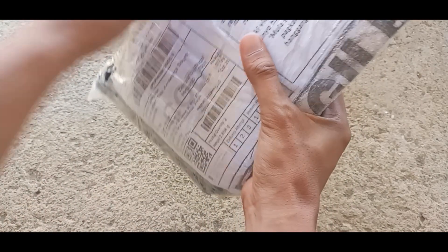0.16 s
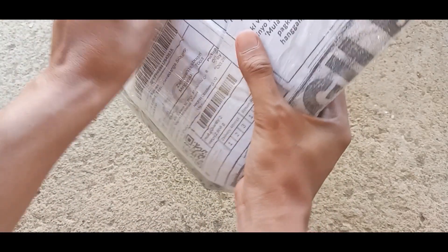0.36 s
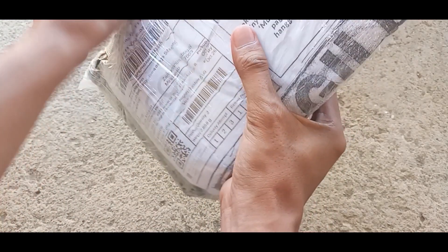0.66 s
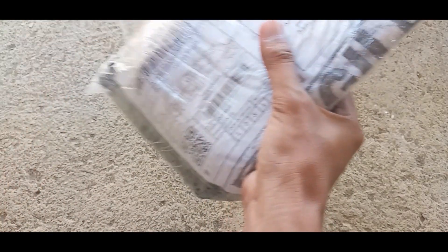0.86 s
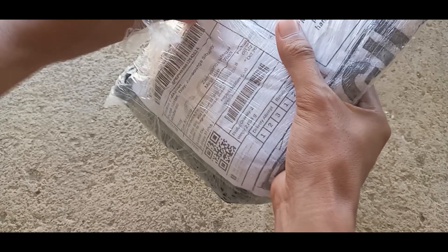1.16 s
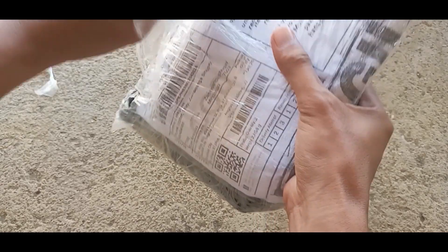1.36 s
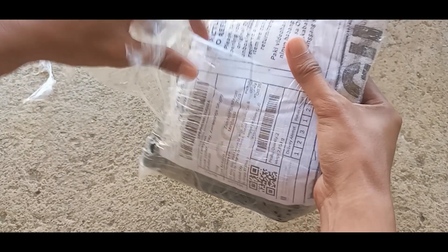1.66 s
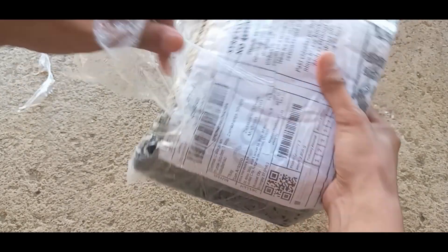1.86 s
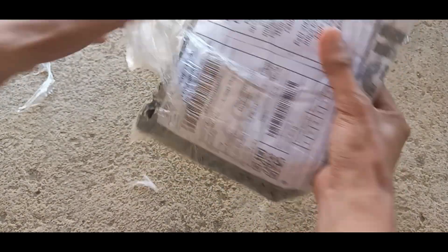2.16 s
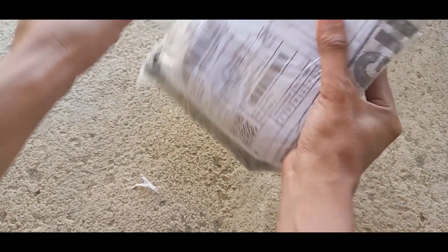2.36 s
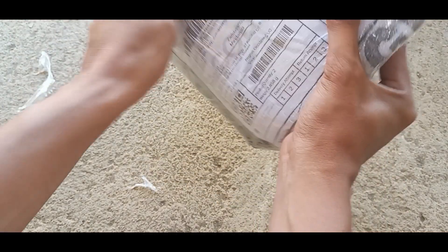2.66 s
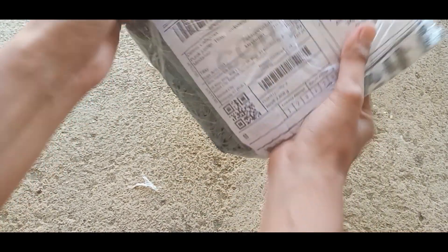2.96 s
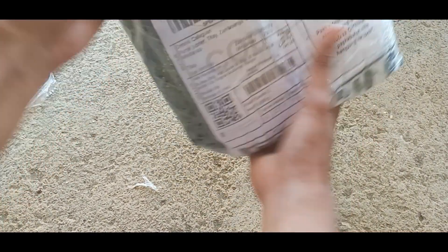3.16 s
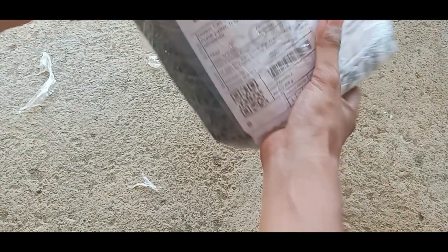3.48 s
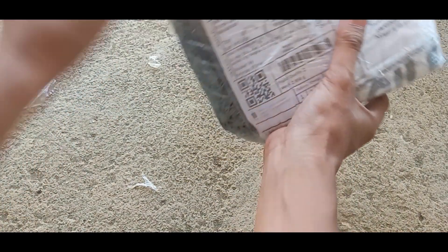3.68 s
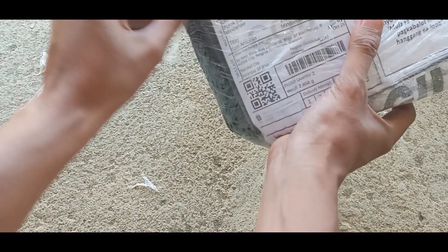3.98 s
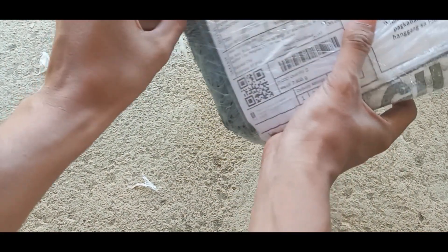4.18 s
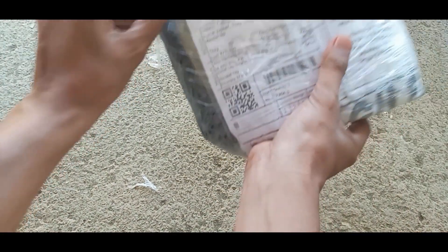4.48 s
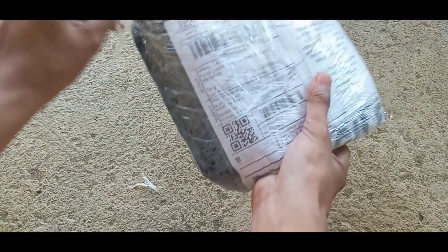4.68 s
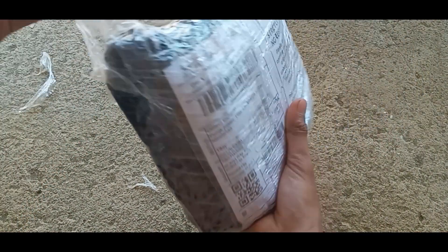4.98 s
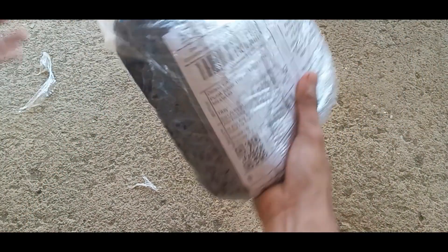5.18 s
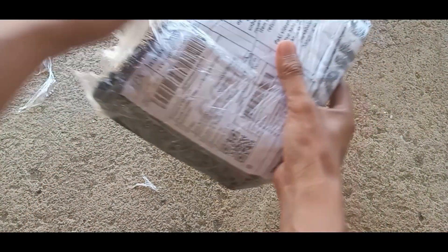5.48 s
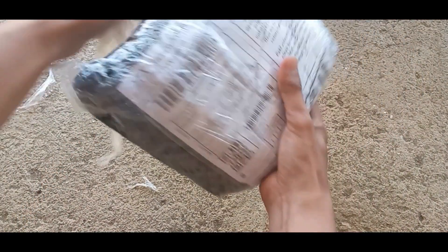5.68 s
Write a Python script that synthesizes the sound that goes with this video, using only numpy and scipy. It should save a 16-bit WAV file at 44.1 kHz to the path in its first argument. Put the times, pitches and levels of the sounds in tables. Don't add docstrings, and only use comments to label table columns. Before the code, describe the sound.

Close, crisp plastic wrap crackles in uneven bursts with hard pops, short lulls, soft bag booms and low puffs of air.

```python
import sys
import numpy as np
from scipy import signal
from scipy.io import wavfile

SR = 44100
rng = np.random.default_rng(int(sys.argv[2]) if len(sys.argv) > 2 else 0)


def elevation(decibels):
    levels = np.asarray(decibels, float)
    return 10 ** (levels / 20)


def generate_wav(signal):
    frames = np.transpose(np.atleast_2d(signal))
    scaled = np.clip(frames, -1, 1) * 32767
    pcm = np.round(scaled).astype(np.int16)
    wavfile.write(sys.argv[1], SR, pcm)


N = 257103
FILM_HZ = 5740

# time in seconds, boom level in dB, air puff level in dB, fade time in seconds.
HAND_BUMPS = [(0.195, -36.5, -48, 0.013), (.45, -55, -46, 0.058), (.694, -49, -54.5, 0.065),
              (1.19, -76, -40, 0.097), (1.44, -53, -42.5, 0.061), (1.615, -37, -37, 0.033),
              (1.72, -48, -62, 0.047), (1.83, -42.5, -48.5, 0.12), (2.031, -39, -54, 0.012),
              (2.201, -49, -46, 0.029), (2.67, -54, -43, 0.024), (2.918, -44.5, -45, 0.017),
              (3.1, -73, -49, 0.011), (3.213, -33, -39.5, 0.0087), (3.33, -43, -49, 0.062),
              (3.408, -41, -46, 0.016), (3.54, -65, -45, 0.035), (3.828, -77, -43, 0.011),
              (4.657, -27, -36, 0.0076), (4.676, -32.5, -40, 0.019), (4.82, -48, -63, 0.015),
              (4.981, -48, -47, 0.045), (5.295, -73, -31, 0.034), (5.36, -67, -50, 0.027),
              (5.45, -56, -35, 0.026), (5.57, -44, -52, 0.089), (5.73, -44, -59, 0.086)]


def rms_one(x):
    return x / np.sqrt(np.mean(x ** 2) + 1e-20)


def band(x, hz, kind, order=2):
    return signal.sosfilt(signal.butter(order, hz, kind, fs=SR, output="sos"), x)


def peak(x, hz, width_hz, db):
    w, g = 2 * np.pi * hz / SR, elevation(db / 2)
    a = np.tan(np.pi * width_hz / SR)
    above = [1 + a * g, -2 * np.cos(w), 1 - a * g]
    below = [1 + a / g, -2 * np.cos(w), 1 - a / g]
    return signal.lfilter(above, below, x)


def drift(rate_hz):
    r = np.exp(-2 * np.pi * rate_hz / SR)
    noise = rng.standard_normal(N + SR)
    return rms_one(signal.lfilter([1], [1, -2 * r, r * r], noise)[SR:])


def sides(pan_db):
    return elevation(np.array([pan_db / 2, -pan_db / 2]))


def swell(s, db, fade_s, rest_db, steep=0.89):
    rise_share = 0.78
    t = np.arange(0, N, 64) / SR
    late = (t - s[:, None]) / np.maximum(fade_s, .005)[:, None]
    fall_db = 10 * steep * np.maximum(late, -late / rise_share)
    power = elevation(db[:, None] - fall_db) ** 2
    level_db = 10 * np.log10(power.sum(axis=0) + elevation(rest_db) ** 2)
    return np.interp(np.arange(N) / SR, t, level_db)


def pause_db(column):
    # middle in seconds, length in seconds, drop of the folds in dB, drop of the film in dB.
    pauses = [(.98, 0.14, 2, -2), (2.29, 0.051, 11, 4), (2.414, 0.069, 14, 3), (3.588, 0.049, 12, -1.5),
              (3.685, 0.049, 11, -1.5), (3.81, 0.033, 8, -3.5), (3.982, 0.086, 7, -0.5),
              (4.092, 0.032, 10, 0.5), (3.195, 0.011, 11, 9), (4.323, 0.026, 7, 7), (4.539, 0.032, 7.5, 3),
              (1.515, 0.017, 6, 5), (2.053, 0.021, 11, 7), (1.678, 0.013, 3, 10), (4.618, 0.027, 11, 0.5),
              (5.186, 0.11, 1.5, -1), (5.405, 0.096, 12, 4)]
    t = np.arange(0, N, 64) / SR
    drop_db = sum(row[column] * np.exp(-(2 * (t - row[0]) / row[1]) ** 4) for row in pauses)
    return np.interp(np.arange(N) / SR, t, drop_db)


def pull():
    # peak time in seconds,
    # film level in dB, fade time in seconds, wide folds re film in dB, bag re film in dB.
    tugs = [(0.0, -34.5, 0.058, -4.5, -26), (0.124, -31, 0.049, -8.5, -35), (0.29, -27.5, 0.18, -5, -13),
            (0.439, -30.5, 0.065, -3.5, -8), (0.536, -30, 0.052, -4.5, -10.5),
            (0.684, -25, 0.077, -4.5, -15), (0.821, -25.5, 0.053, -7, -13.5),
            (1.064, -59, 0.73, -6, -27), (1.153, -31.5, 0.13, -11, -19.5), (1.248, -27, 0.011, -7, -12),
            (1.364, -24, 0.19, -5, -14.5), (1.481, -24, 0.012, -5, -37), (1.552, -29, 0.02, -13, -8.5),
            (1.622, -28.5, 0.034, -5, -12), (1.715, -29, 0.2, -5, -11), (1.851, -22, 0.048, -4, -15.5),
            (1.974, -30.5, 0.2, -3, -13.5), (2.152, -30.5, 0.081, -7.5, -13.5),
            (2.346, -37.5, 0.037, -6, -36), (2.455, -34.5, 0.032, -1, -4),
            (2.53, -23.5, 0.039, -9, -11.5), (2.613, -26, 0.12, -6.5, -10.5),
            (2.72, -25.5, 0.048, -4, -22), (2.804, -30.5, 0.12, -0.5, -22),
            (2.915, -27.5, 0.046, -5.5, -8), (2.977, -26, 0.067, -5.5, -13),
               (3.113, -24.5, 0.069, -9, -14.5), (3.298, -33, 0.18, -0.5, -5),
               (3.401, -24, 0.023, -13, -18), (3.499, -30, 0.058, -6.5, -22),
               (3.631, -37, 0.073, -0.5, -15), (3.753, -38.5, 0.1, -5.5, -12),
               (3.881, -32, 0.06, -6.5, -15.5), (4.036, -44, 0.022, 5.5, -1),
               (4.101, -26.5, 0.0087, 2.5, -35), (4.207, -25, 0.085, -6, -14.5),
               (4.269, -27, 0.038, -7, -21), (4.363, -34, 0.041, -3.5, -15),
               (4.465, -29.5, 0.085, -23, -40), (4.485, -38, 0.12, 7.5, -9), (4.662, -23, 0.065, -3.5, -11),
               (4.796, -29.5, 0.11, -6.5, -11.5), (4.956, -28.5, 0.063, -3.5, -15),
               (5.115, -47, 0.096, -3, -17), (5.298, -49.5, 0.16, 3.5, -9), (5.491, -31, 0.026, 1.5, -3),
               (5.606, -28.5, 0.16, -4, -11), (5.733, -25.5, 0.072, -5, -13.5)]
    s, db, fade_s, fold_db, bag_db = np.array(tugs).T
    low_db = pause_db(column=2)
    film = swell(s, db, fade_s, rest_db=-43) - pause_db(column=3)
    folds = swell(s, db + fold_db, fade_s, rest_db=-72, steep=0.93) - low_db
    ring = swell(s, db + bag_db, fade_s, rest_db=-88, steep=1.19) - low_db
    boom = swell(s, db + bag_db - 7.5, fade_s, rest_db=-63.5, steep=1.33) - 0.26 * low_db
    return film, folds, ring, boom


def cracks(decay_s, alike, size):
    t = np.arange(size) / SR
    common, left, right = np.moveaxis(rng.standard_normal((len(decay_s), 3, size)), 1, 0)
    alike = np.clip(alike, 0, 1)
    pair = np.sqrt(alike) * common + np.sqrt(1 - alike) * np.array([left, right])
    onset = 1 - np.exp(-t / .0001)
    return pair * np.exp(-t / decay_s[:, None]) * onset


def scatter(bursts, times):
    lag_s, lag_spread_s = .00095, .00004
    lag = lag_s + lag_spread_s * rng.standard_normal(len(times))
    out = []
    for wave, start in zip(bursts, (times + lag, times)):
        at = np.round(start * SR).astype(int)[:, None] + np.arange(wave.shape[1])
        out.append(np.bincount(at.ravel(), wave.ravel(), N + SR)[:N])
    return np.array(out)


def buckles(count=17000):
    when, size, length, colour = rng.random((count, 4)).T
    times = when * N / SR
    size_db = 2.06 * np.minimum(-np.log(1 - size), 3.8)
    size_db = size_db + 1.28 * drift(32.0)[(times * SR).astype(int)]
    bursts = cracks(.00016 * elevation(14 * length), alike=0.73, size=120)
    bursts = bursts + (2 * colour[:, None] - 1) * np.roll(bursts, 4, axis=2)
    return scatter(bursts * elevation(size_db)[:, None], times)


def bag_boom(grains, boom_db):
    boom = rms_one(band(grains, [220, 760], "band", order=3)) * elevation(boom_db + 2.0)
    s, bump_db, _, fade_s = np.transpose(HAND_BUMPS)
    thud_db = swell(s, bump_db, 0.55 * fade_s, rest_db=-120)
    return boom + rms_one(band(grains, [210, 480], "band")) * elevation(thud_db + 2.5)


def bag_ring(grains, ring_db):
    # peak time in seconds, level in dB, fade time in seconds.
    drumming = [(.27, -52, 0.023), (.33, -47, 0.036), (.69, -47, 0.046), (1.02, -72, .03),
                (1.36, -72, 0.043), (2.03, -40, 0.011), (2.53, -61, 0.023), (2.59, -44, 0.02),
                (2.66, -48, .015), (2.70, -40, .015), (2.73, -37, .02), (2.8, -45, 0.04),
                (4.49, -50, 0.033), (5.49, -64, 0.025)]
    panel_hz, panel_width_hz = 1090, 550
    ring = rms_one(band(grains, [950, 1400], "band")) * elevation(ring_db - 4.5)
    s, db, fade_s = np.transpose(drumming)
    panel = band(grains, [panel_hz - panel_width_hz / 2, panel_hz + panel_width_hz / 2], "band")
    return ring + rms_one(panel) * elevation(swell(s, db, fade_s, rest_db=-120))


def crinkle():
    film_db, sheet_db, ring_db, boom_db = pull()
    grains = buckles()
    boom = bag_boom(grains, boom_db)
    bag = bag_ring(grains, ring_db)
    lean_db = ring_db - sheet_db
    lean_db = np.clip(lean_db - np.mean(lean_db), -18, 2)
    edges_hz = 1500 * 2 ** np.arange(0, 3.6, .35)
    patches = []
    for k in range(10):
        patch_db = 1.9 * drift(7.5) + 0.68 * lean_db / (1 + k)
        if k > 7:
            patch_db = patch_db + 0.19 * (film_db - film_db.mean())
        if k < 5:
            patch_db = patch_db + 0.17 * k * pause_db(column=2)
        patches.append((-1) ** k * band(grains, edges_hz[k:k + 2], "band") * elevation(patch_db))
    sheet = rms_one(sum(patches[:5])) * elevation(sheet_db - 1.5)
    film = rms_one(band(sum(patches[5:]), 3000, "high", order=4)) * elevation(film_db - 5.0)
    return (boom - bag + sheet + film) * sides(0.93 * drift(1.9))


def snaps(rows, decay_s):
    times, level_db, fold_hz, bright_db = rows.T
    decay_s = decay_s * elevation(.15 * (level_db - level_db.mean()))
    bursts = cracks(decay_s, alike=0.58, size=500)
    bright = band(bursts * np.exp(-np.arange(500) / SR / .0012), 4000, "high")
    folds = [band(bursts[:, k], [hz / 1.193, hz * 1.33], "band") for k, hz in enumerate(fold_hz)]
    folds = np.swapaxes(np.array(folds), 0, 1)
    sheet_gain = elevation(-9.0 + 0.35 * np.clip(level_db + 13.5, 0, 20))
    folds = folds + sheet_gain[:, None] * band(bursts, [850, 5200], "band")
    bright = bright / bright[:, :, :80].std(axis=(0, 2), keepdims=True)
    folds = folds / folds[:, :, :80].std(axis=(0, 2), keepdims=True)
    fold_gain = elevation(level_db - 14.5) / np.sqrt(1 + elevation(bright_db) ** 2)
    mixed = folds + bright * elevation(bright_db - 6.0)[:, None]
    return scatter(mixed * fold_gain[:, None], times - .0012)


def stray_snaps(count=70):
    when, size, pitch, colour = rng.random((count, 4)).T
    fold_db = pull()[1][(when * N).astype(int)]
    level_db = fold_db - 5 + 0.5 * np.log(1 - size)
    fold_hz = FILM_HZ * (0.25 + 0.44 * np.sqrt(pitch))
    bright_db = 11 + 16 * (colour - .5)
    return np.transpose([0.0012 + when * N / SR, level_db, fold_hz, bright_db])


def loud_snaps():
    # time in seconds, level in dB, fold pitch in Hz, brightness in dB.
    fold_rows = [(.6627, -11, 2200, 2), (.741, -2.5, 1980, 9.5), (1.4226, -11, 2080, -16),
                 (1.543, 0, 2500, 11.5), (1.661, 4, 2800, 15), (1.6908, 5.5, 2260, 6.5),
                 (1.8289, 2, 2280, 11), (1.9276, -2.5, 2260, 6), (2.0234, -1, 3360, 10),
                 (2.3324, -21.5, 3520, -3), (2.444, -20, 2600, 0), (2.6939, -9, 1100, -25),
                 (3.0875, -12.5, 2570, -20), (3.1732, 1.5, 2200, 20), (3.2038, 9.5, 2830, 8.5),
                 (3.5077, -12, 2640, -7), (3.6172, -15, 2190, 8), (3.759, -12, 1930, -7),
                 (3.8614, -8, 2040, -8), (3.899, -14.5, 1270, -4), (4.0188, -20.5, 2570, -9),
                 (4.107, -12, 3230, -22), (4.41, 0, 2500, 6), (4.4658, -4, 1320, 11),
                 (4.5783, -7, 3050, -1.5), (4.651, 6, 3020, 12), (4.7302, -10, 2300, -9),
                 (4.9838, -8.5, 2800, 1), (5.3372, -4, 2480, 12), (5.474, -20, 3340, -10)]
    # time in seconds, level in dB, brightness in dB.
    film_rows = [(0.0857, -17, 16), (0.8015, -9, 8), (1.071, -14, 23), (1.2973, -2.5, 11),
                 (1.4862, -0.5, 23), (1.526, -12, 28), (1.619, -4, 17), (1.853, 6.5, 34), (1.8878, 3, 10),
                 (1.99, -12, 6), (2.5566, -7, 4.5), (2.838, -4.5, 28), (2.8602, 3, 18), (3.144, 3, 33),
                 (3.3524, -2, 17), (3.396, -3, 18), (4.0586, -7, 20), (4.0979, -7, 11), (4.166, -6, 11),
                 (4.346, -11, 5), (4.4426, 1.5, 14), (4.458, 3.5, 22), (4.5, 2, 29), (4.64, 6, 25),
                 (4.6638, -2, 13), (4.672, -7, 0), (4.6794, 4, 19), (4.686, -6, 0), (4.9015, -9, 2),
                 (5.187, -12, 38)]
    taut = [(s, db, FILM_HZ, bright_db) for s, db, bright_db in film_rows]
    return snaps(np.vstack([fold_rows, taut, stray_snaps()]), decay_s=0.0015)


def ticks():
    # time in
    # seconds, peak level in dB, fold pitch in Hz, brightness in dB.
    tick_rows = [(0.0223, -25, 4160, 8), (0.0634, -20, 3970, 13), (0.1126, -23, 2250, 17),
                 (0.185, -13, 3250, 8), (0.217, -19, 2950, 8), (0.2526, -19, 4390, 8),
                 (0.3393, -9, 4260, 10), (0.4375, -16, 2760, 2), (0.519, -13.5, 3200, 8),
                 (0.5659, -11, 2680, 4), (0.639, -21, 4220, 11), (0.6876, -21, 1220, 14),
                 (0.8567, -14.5, 1090, 7), (0.921, -21, 3720, 1), (0.9525, -26, 3500, 10),
                 (1.0011, -27, 4440, 10), (1.0591, -11.5, 4105, 15), (1.0988, -18.5, 4470, 17),
                 (1.1194, -19, 4050, 12), (1.2294, -29, 4320, 11), (1.275, -17, 4350, 3),
                 (1.4431, -26, 3980, 4), (1.4782, -10.5, 2130, 6), (1.8117, -13, 2900, 10),
                 (1.8996, -10, 2980, 3), (2.035, -15, 2170, 4), (2.0657, -14, 4350, 11),
                 (2.1026, -16, 2160, 8), (2.1211, -12, 3030, 20), (2.135, -23, 4250, 7),
                 (2.365, -29, 4400, 15), (2.185, -20, 1370, 1), (2.453, -15.5, 2710, 2),
                 (2.502, -18, 2880, 11), (2.5173, -10.5, 1000, 9.5), (2.6, -13, 1030, 5),
                 (2.614, -14, 4340, -4), (2.6797, -19, 1180, 10), (2.7154, -10.5, 1100, 3),
                 (2.747, -16, 3470, -1), (2.798, -13, 4200, 8), (2.8805, -10, 3230, 17),
                 (2.9192, -12.5, 4420, 2), (2.959, -13, 1960, 4), (2.9943, -11, 4080, 8),
                 (3.0479, -12, 2000, 7), (3.099, -9, 4420, 8), (3.1265, -15, 4080, 12),
                 (3.2923, -19, 2210, 0), (3.324, -18, 4200, 20), (3.4425, -25, 4370, 8),
                 (3.4787, -15, 4140, 20), (3.4994, -19, 3100, 5), (3.537, -18.5, 3760, 14),
                 (3.6264, -23, 2500, 7), (3.695, -24, 4240, 6), (3.7993, -33, 4430, 13),
                 (3.821, -19, 2150, 12), (3.9292, -18, 4470, 18), (3.9564, -33, 4140, 0),
                 (3.97, -15.5, 4050, 34), (4.14, -22, 4280, 5), (4.177, -15, 4300, 10),
                 (4.2413, -14, 3200, 7), (4.478, -1, 4430, 13), (4.5622, -17.5, 1310, 1.5),
                 (4.6128, -10, 1330, 11), (4.75, -24, 3170, 4), (4.78, -13, 1340, 16),
                 (4.8144, -13, 3460, 5), (4.961, -16, 2900, 19), (5.009, -16, 2720, 12),
                 (5.077, -15.5, 3780, 16), (5.0993, -28, 3890, 12), (5.2036, -28, 2110, 7),
                 (5.2767, -29, 4170, 0), (5.2947, -25.5, 2110, -4), (5.3971, -39, 3600, 8),
                 (5.5494, -20, 3270, 1), (5.6, -14, 2290, 2), (5.6403, -12, 4400, 5), (5.689, -12, 2950, 8),
                 (5.7644, -15, 3240, 2),
                 (0.2905, -14, 1060, 2), (0.4094, -15, 2570, 4), (0.47, -28, 4310, 8),
                 (0.5817, -34, 2210, 13), (0.6977, -13.5, 1080, 3.5), (0.873, -14, 3760, 8),
                 (1.7072, -13, 2910, 3), (1.7256, -14, 1980, -3), (1.996, -16, 3080, 4),
                 (2.2, -18, 1250, 5), (2.2324, -18, 3970, 8), (2.5324, -19, 1150, 6),
                 (2.7344, -12, 3230, 6), (3.1346, -17, 3360, 12), (3.1512, -16, 4330, 12),
                 (3.4094, -15, 4340, 12), (3.8794, -34, 1750, 15), (4.027, -28, 2000, 0),
                 (4.214, -26, 4020, 16), (4.044, -35, 1220, 4), (4.373, -21, 1180, 4),
                 (4.389, -16, 2000, 6), (4.458, -15, 1210, 3), (4.492, -11, 1240, 4), (4.507, -12, 1300, 5),
                 (5.0244, -31, 3760, 8), (5.124, -28, 4380, 4), (5.1344, -27, 1950, 7),
                 (5.1505, -29, 1930, 8), (5.482, -15, 3430, 16), (5.62, -11, 3990, 11),
                 (5.772, -9, 3200, 6), (5.7828, -7, 3060, 7), (5.7934, -11.5, 3190, 8)]
    rows = np.array(tick_rows)
    return snaps(rows + [.001, 5, 0, 0], decay_s=0.00055)


def singing():
    # start in seconds, level in dB, pitch in Hz, decay in seconds.
    strips = [
        (.954, -60, 2200, .04),
        (2.079, -45, 2150, .012),
        (3.985, -60, 1000, .025),
        (3.68, -57, 3400, .02),
    ]
    start_s, level_db, pitch_hz, decay_s = np.transpose(strips)
    bursts = cracks(decay_s, alike=1.0, size=5000)
    rings = [band(bursts[:, k], [hz / 1.03, hz * 1.03], "band") for k, hz in enumerate(pitch_hz)]
    rings = np.array(rings)
    rings = rings / rings[:, :, :900].std(axis=(1, 2), keepdims=True)
    return scatter(np.swapaxes(rings, 0, 1) * elevation(level_db)[:, None], start_s)


def thumps():
    # start in seconds, level in dB, pitch in Hz, left-right difference in dB.
    slumps = [(0.196, -31, 250, 3), (1.609, -29, 170, 4), (2.916, -29, 198, 3), (3.207, -37, 150, -4),
              (4.6491, -11, 107, 16.5), (4.672, -18, 129, 16), (4.978, -32, 200, 4),
              (5.238, -23.5, 128, 13), (5.339, -22, 127, 19), (5.417, -22.5, 120, 23),
              (5.363, -16, 129, 19), (5.57, -39, 250, 4)]
    damping_cycles = 0.65
    out = np.zeros((2, N))
    for s, db, hz, pan_db in slumps:
        turn = np.arange(SR // 10) / SR * hz
        swing = np.sin(2 * np.pi * turn ** 0.78) * np.exp(-turn * 2.0 / damping_cycles)
        at = round(s * SR)
        out[:, at:at + len(swing)] += elevation(db) * swing * sides(pan_db)[:, None]
    return band(band(out, 71, "high", order=3), 306, "low", order=3)


def room(x):
    t60_s, tail_db = .13, -21
    echo_s, echo_gain, echo_cut_hz = .00125, .35, 1100
    t = np.arange(SR // 2) / SR
    tail = rng.standard_normal((2, len(t))) * elevation(-60 * t / t60_s) * (t > .004)
    tail = tail / np.sqrt(np.sum(tail ** 2, axis=1, keepdims=True))
    echo = band(x, echo_cut_hz, "low", order=1)
    echo = np.pad(echo, ((0, 0), (round(echo_s * SR), 0)))[:, :N]
    return x - echo_gain * echo + elevation(tail_db) * signal.fftconvolve(x, tail, axes=1)[:, :N]


def rumble():
    # time in seconds, level in dB, left-right difference in dB.
    air_rows = [(0, -50, 10), (.08, -39, 3), (.36, -58, 3), (.75, -48, 13), (1.15, -45.5, 3.5),
                (1.3, -69, 0), (2, -56, -1), (2.45, -41, 2), (2.72, -63, -4), (2.82, -78, -3),
                (3.2, -60, 4), (4.03, -38, 1.5), (4.42, -61.5, 6), (4.9, -60.5, 3), (5.05, -46, 7),
                (5.2, -41.5, 8), (5.39, -29, 22), (5.83, -57.5, -3)]
    row_s, row_db, row_pan_db = np.transpose(air_rows)
    t = np.arange(N) / SR
    hum_db, pan_db = np.interp(t, row_s, row_db), np.interp(t, row_s, row_pan_db)
    s, _, air_db, fade_s = np.transpose(HAND_BUMPS)
    puff_db = swell(s, air_db, fade_s, rest_db=-120)
    level_db = 10 * np.log10(elevation(hum_db) ** 2 + elevation(puff_db) ** 2)
    pan_db = pan_db + 34 * np.clip((puff_db + 39.0) / 20, 0, 1)
    common, left, right = rng.standard_normal((3, N))
    noise = band(1.47 * common + np.array([left, right]), 46, "high", order=3)
    low = band(band(noise, [85, 190], "band", order=3), 300, "low", order=4)
    low = low + elevation(-0.5) * band(noise, [56, 90], "band") * [[1], [.4]]
    low = peak(peak(low, 108, 25, 8), 145, 30, 5)
    gust = rms_one(band(noise, [55, 330], "band", order=3)) * elevation(level_db + 28.0 - 26.0)
    lumps = elevation(4.1 * np.array([drift(6.4), drift(9.0)]))
    share = sides(pan_db)
    return (rms_one(low * lumps) + gust * lumps) * elevation(level_db + 8.5) * share / share.sum(axis=0)


def hiss():
    high = elevation(-58) * band(rng.standard_normal((2, N)), 4000, "high", order=1)
    middle = elevation(-68) * band(rng.standard_normal((2, N)), [350, 2500], "band", order=1)
    return high + middle


def scene():
    film = room(singing() + crinkle() + loud_snaps())
    return film + room(ticks()) + thumps() + rumble() + hiss()


def roll_off(x):
    return signal.sosfilt(signal.butter(12, 15860, fs=SR, output="sos"), x)


def record(dry):
    # frequency in Hz, width in Hz, gain in dB.
    left_modes = [(637, 190, 6), (1500, 220, 3), (2200, 1820, 4.5), (6995, 3950, 19.5), (11740, 4560, -14),
                  (14060, 1030, 7.5), (15100, 550, 13.5)]
    # frequency in Hz, width in Hz, gain in dB.
    right_modes = [(698, 220, 5.5), (5780, 2400, 7.5), (8340, 1800, -3.5), (10190, 2600, 8.5),
                   (13700, 1750, -6), (13900, 960, -9), (15220, 290, 21.5)]
    left, right = dry
    for hz, width_hz, db in left_modes:
        left = peak(left, hz, width_hz, db)
    for hz, width_hz, db in right_modes:
        right = peak(right, hz, width_hz, db)
    ports = np.array([left * elevation(-2.5), right * elevation(-4.0)])
    treble = signal.sosfiltfilt(signal.butter(4, 8600, "high", fs=SR, output="sos"), ports)
    ports = ports + .22 * treble[::-1]
    top_cut = signal.cheby2(16, 28, 16500, fs=SR, output="sos")
    ports = signal.sosfilt(top_cut, np.tanh(ports))
    return roll_off(ports)


dry = scene()
out = record(dry)
generate_wav(out)
```